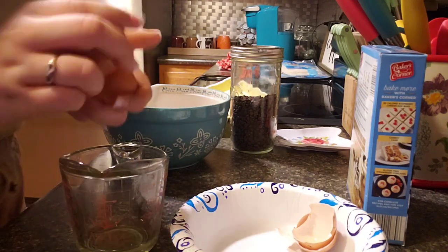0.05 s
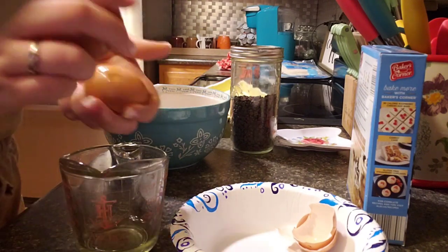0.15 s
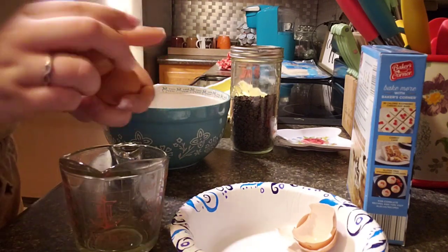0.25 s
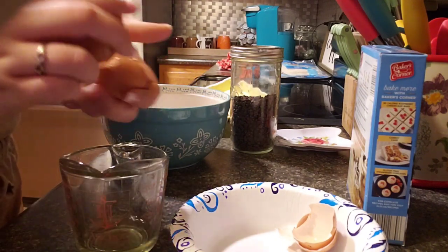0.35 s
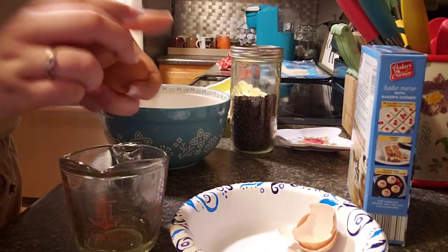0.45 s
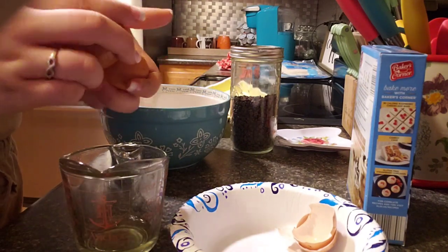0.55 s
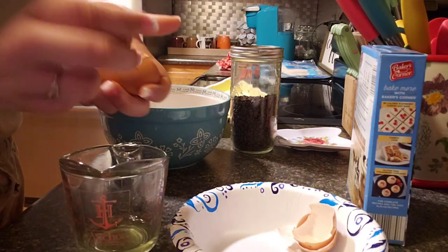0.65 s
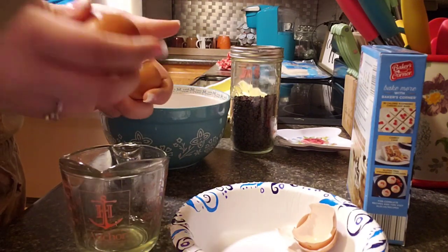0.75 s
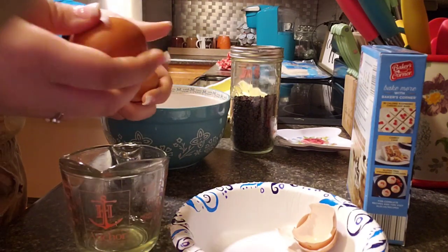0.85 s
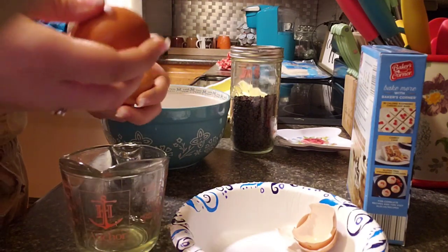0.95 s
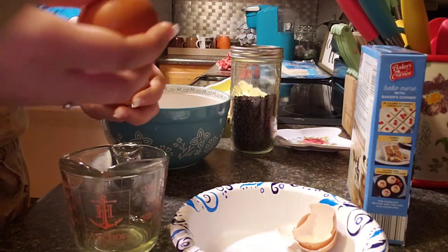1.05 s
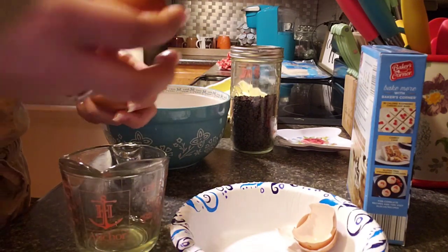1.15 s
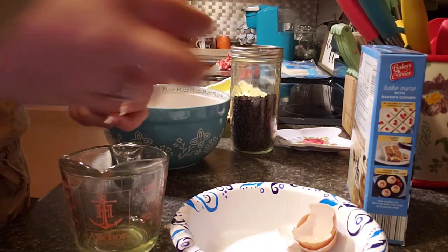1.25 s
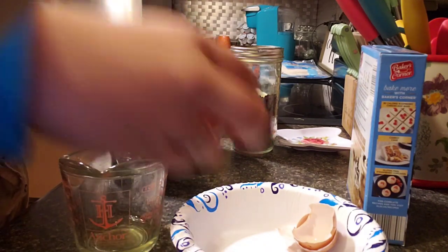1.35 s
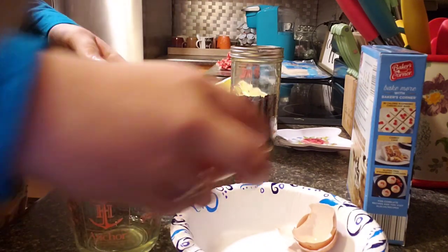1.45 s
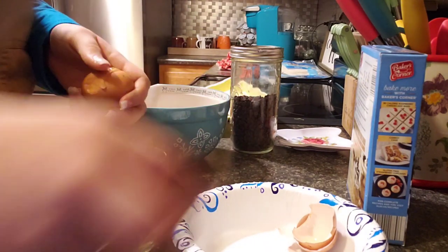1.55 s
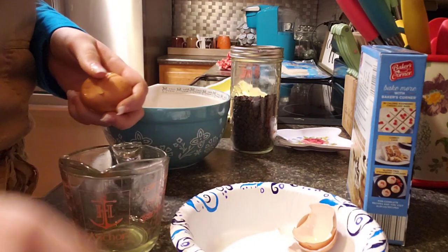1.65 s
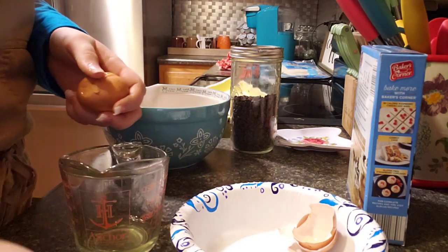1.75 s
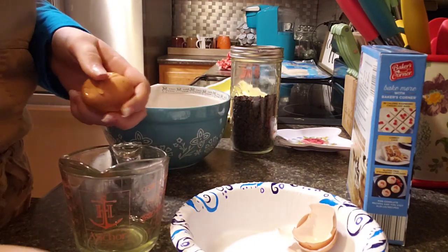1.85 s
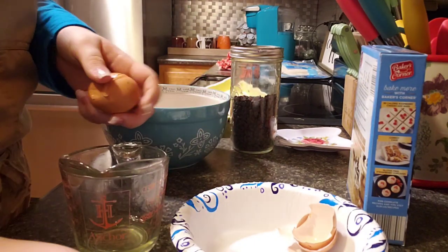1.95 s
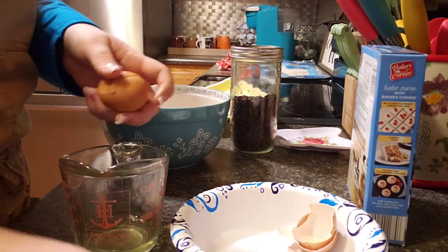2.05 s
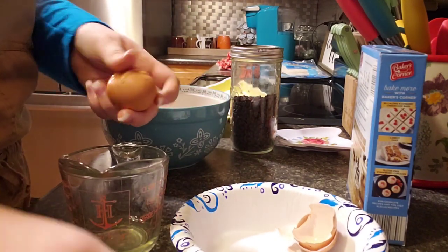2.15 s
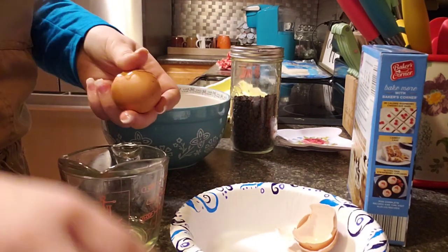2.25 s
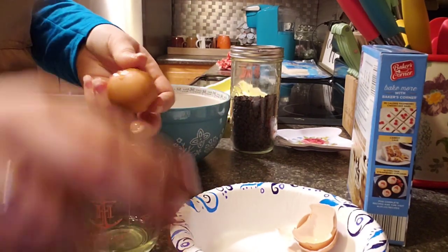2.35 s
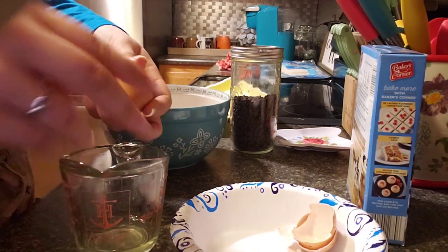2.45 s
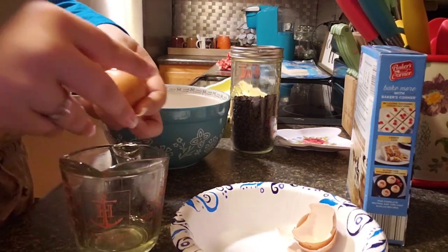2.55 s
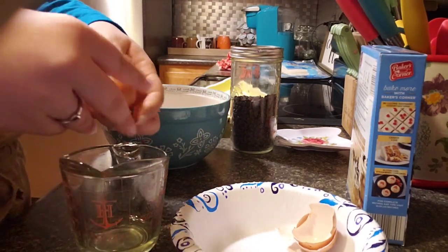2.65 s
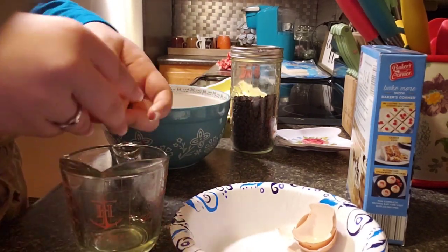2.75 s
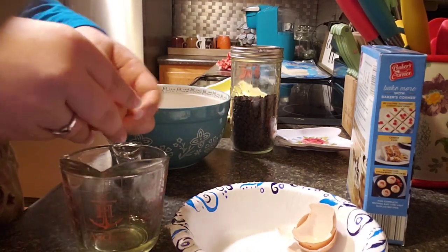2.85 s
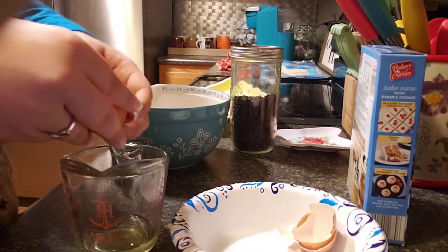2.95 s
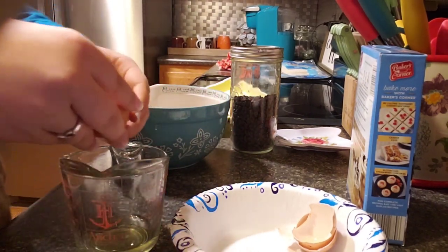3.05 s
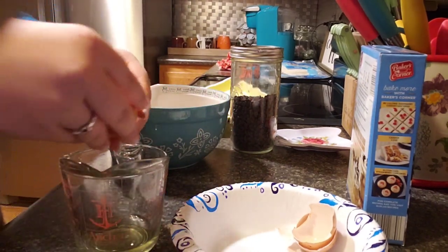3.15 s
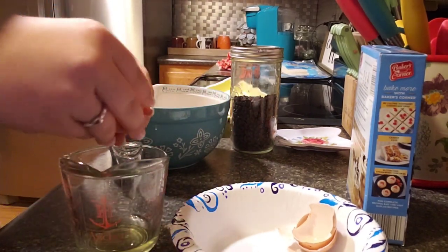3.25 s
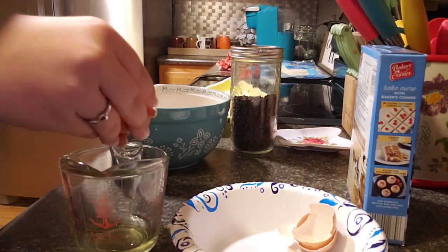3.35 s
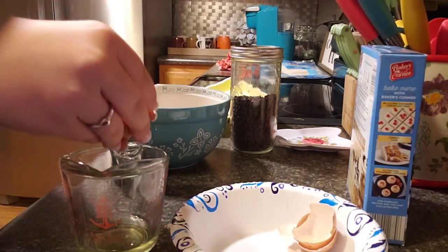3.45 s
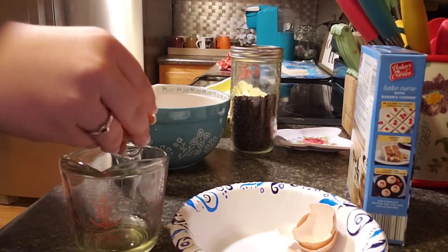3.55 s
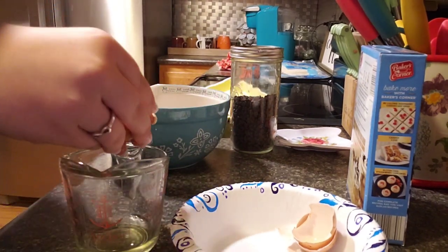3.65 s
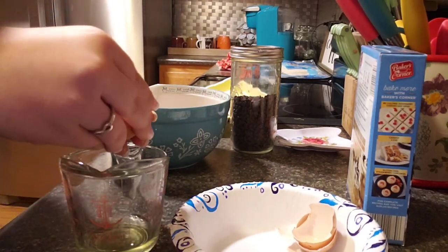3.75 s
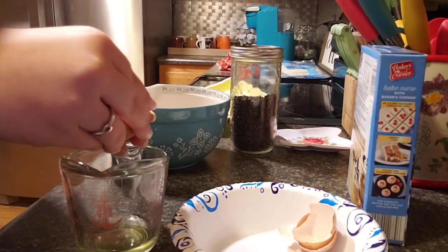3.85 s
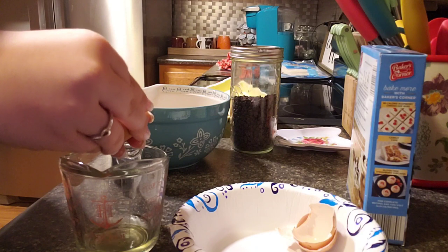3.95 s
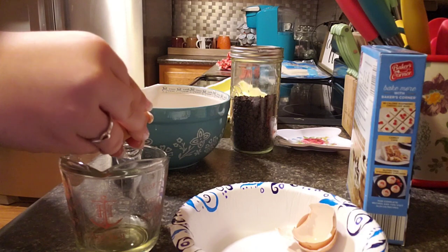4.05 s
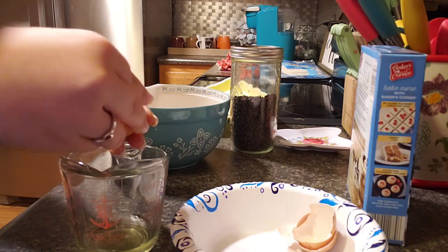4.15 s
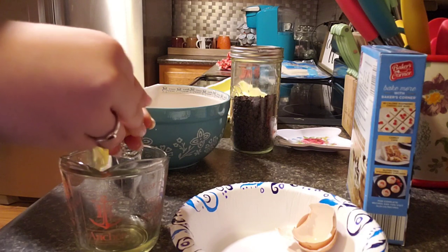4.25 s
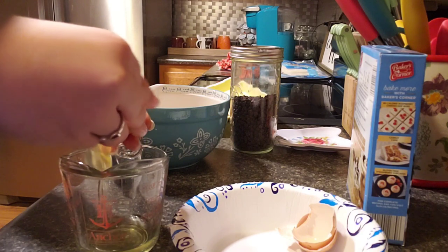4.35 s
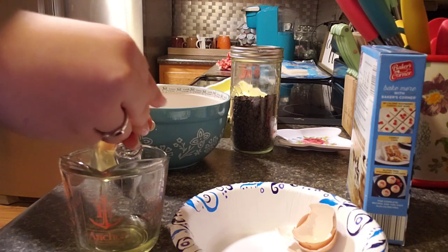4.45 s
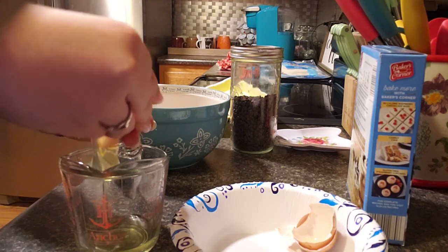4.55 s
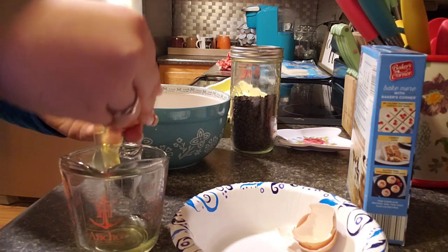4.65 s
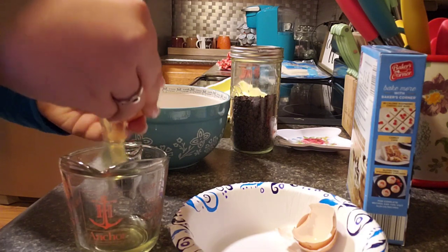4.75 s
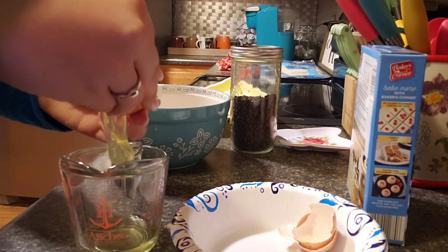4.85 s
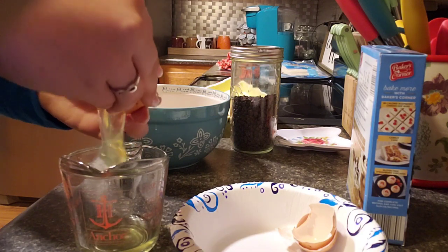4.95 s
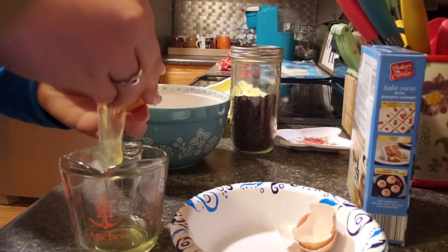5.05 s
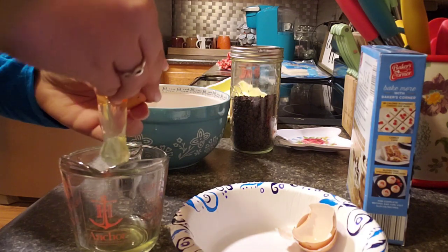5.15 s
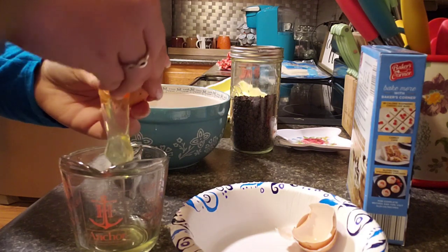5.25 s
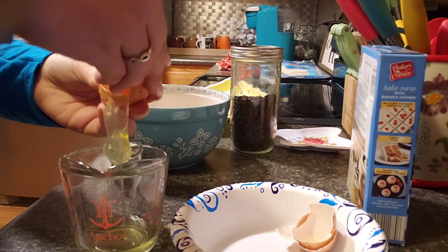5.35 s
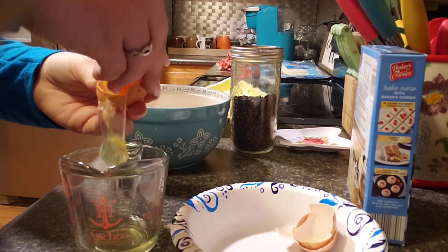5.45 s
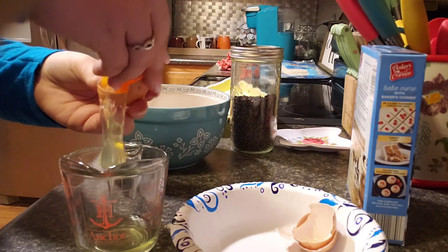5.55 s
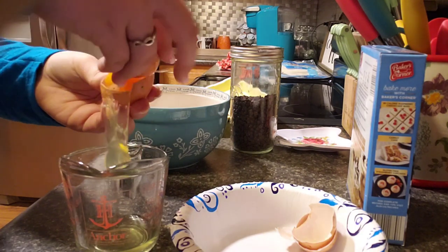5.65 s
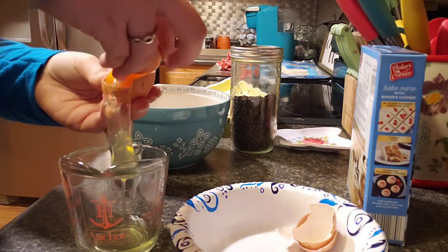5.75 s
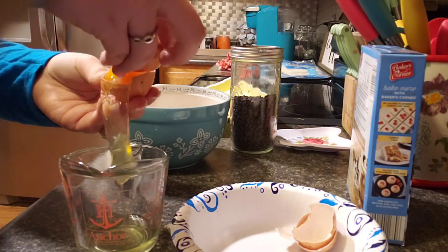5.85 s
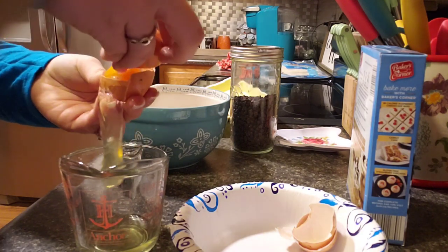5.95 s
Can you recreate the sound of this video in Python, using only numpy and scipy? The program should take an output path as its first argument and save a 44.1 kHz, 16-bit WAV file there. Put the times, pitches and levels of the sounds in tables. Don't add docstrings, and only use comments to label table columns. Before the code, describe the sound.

Three sharp eggshell knocks open the scene, the last weaker. Then a loud, dull dish thud with rapid bounces and a brief wobble, leaning left. Skin and sleeves rustle softly; small ticks lead to a sudden crisp crack, followed by quieter splintering and a short tear. Small live kitchen, close phone microphones with uneven stereo, quiet motor rumble and airy hiss underneath.

```python
import sys
import numpy as np
from scipy import signal
from scipy.fft import irfft
from scipy.io import wavfile
from scipy.ndimage import uniform_filter1d

SR = 44100
rng = np.random.default_rng(int(sys.argv[2]) if len(sys.argv) > 2 else 0)


def bounce(signal):
    frames = np.transpose(np.atleast_2d(signal))
    limited = np.clip(frames, -1, 1)
    pcm = np.round(limited * 32767).astype(np.int16)
    wavfile.write(sys.argv[1], SR, pcm)


def gain_from_db(level_db):
    decades = np.asarray(level_db, float) / 20
    return 10 ** decades


N = 264511
T = np.arange(N) / SR

# t/s, peak level/dB, rise/s, crunch t60/s, bowl ring level/dB
KNOCKS = [
    (0.087, -7.5, 0.00042, 0.044, -40),
    (0.297, -8, 0.0024, 0.056, -9),
    (0.5064, -11.5, 0.002, 0.051, -9.5),
]
# f/Hz, density level/dB
KNOCK_COLOURS = [
    [(500, -19), (950, -6.5), (1400, -13.5), (1800, -11), (2750, 3), (4000, -4), (5500, -6.5), (6600, -1.5),
     (8500, -14.5), (9600, -8), (11000, -14), (16000, -16.5)],
    [(500, -59), (1100, -32), (1800, -23), (2300, -20), (3000, -1.5), (3800, -1), (4500, -8.5), (5200, -15),
     (7200, 1), (8200, -10.5), (9800, -9.5), (16000, -11)],
    [(500, -37.5), (1250, -24.5), (1760, -10), (2150, -17), (2800, -4.5), (3700, -0.5), (5400, -7.5),
     (7200, -1), (8700, -10.5), (9600, -1), (12500, -12.5), (16000, -16)],
]
# f/Hz, level/dB, t60/s
BOWL_MODES = [(330, -8.5, 0.054), (594, 4.5, 0.032), (650.5, 2, 0.044), (675, -5, 0.028),
              (890, -14.5, 0.055), (1320, -17.5, 0.028)]
# t/s, peak level/dB, ring f/Hz
KNOCK_SPLINTERS = [(0.0875, -22.5, 6670), (0.0875, -13.5, 2720), (0.0881, -15.5, 3980), (0.0895, -21, 9570),
                   (0.0904, -17.5, 6400), (0.0906, -16.5, 2560), (0.0919, -22.5, 4280),
                   (0.093, -23.5, 9000), (0.0941, -24, 10470), (0.0942, -21.5, 4900), (0.0946, -32, 1650),
                   (0.0953, -16, 2870), (0.0984, -24, 9560), (0.101, -24.5, 2620), (0.1031, -23.5, 9600),
                   (0.1035, -28.5, 2760), (0.106, -30.5, 6650), (0.1104, -31.5, 1800), (0.1254, -28, 3100),
                   (0.2985, -23, 2490), (0.2996, -32, 7040), (0.2996, -12.5, 5200), (0.3003, -27, 8600),
                   (0.301, -21, 10500), (0.3016, -15.5, 2380), (0.3019, -27, 11710), (0.3027, -25.5, 6980),
                   (0.3034, -18.5, 3450), (0.3039, -19.5, 4680), (0.3041, -18, 10000), (0.3056, -19, 7430),
                   (0.3058, -18, 8960), (0.3065, -20.5, 2820), (0.3078, -19, 7200), (0.3114, -31, 5130),
                   (0.3123, -30, 6720), (0.313, -32.5, 9450), (0.3139, -23, 3627), (0.3156, -26.5, 6650),
                   (0.5086, -24.5, 8870), (0.5091, -17.5, 2680), (0.5104, -23.5, 5200), (0.5109, -23, 3900),
                   (0.5113, -24, 8000), (0.5118, -24.5, 5860), (0.5118, -32, 9390), (0.5118, -24, 2540),
                   (0.5129, -23.5, 4300), (0.5135, -30, 9500), (0.514, -41, 7630), (0.5144, -23, 5700),
                   (0.5151, -33, 10420), (0.5173, -32, 5770), (0.5191, -25, 2900), (0.5193, -34, 6300),
                   (0.52, -31, 7670), (0.528, -25, 3790)]
# t/s, peak level/dB, ring f/Hz
SHELL_FLEX = [(0.0868, -19, 1864), (0.0872, -30, 887), (0.0885, -28, 1460), (0.0882, -20.5, 4610),
              (0.2985, -30.5, 1676), (0.508, -25.5, 1790), (0.5085, -46, 1300), (0.088, -37.5, 345),
              (0.0885, -21, 5690), (0.3, -22.5, 5950), (4.146, -25.5, 4380), (4.1462, -25, 5410),
              (4.149, -33.5, 4680)]
# t/s, peak level/dB, ring f/Hz
PRISE_SPLINTERS = [(4.0275, -33, 4730), (4.0329, -31.5, 3860), (4.0356, -35, 4600), (4.0391, -38, 3600),
                   (4.0429, -41, 3550), (4.0518, -35, 4700), (4.0596, -40, 3500), (4.0629, -42, 3620),
                   (4.0639, -48, 2500), (4.0667, -40, 2220), (4.077, -41, 3800), (4.0812, -39, 2300),
                   (4.0832, -40, 2500), (4.0863, -47, 2500), (4.0904, -42, 2330), (4.093, -49, 2410),
                   (4.0953, -42, 3790), (4.1053, -41, 3640), (4.1352, -35, 4400), (4.1383, -41, 2460),
                   (4.1419, -42, 4650), (4.1458, -30, 6270), (4.1459, -29, 8100), (4.1465, -22, 9740),
                   (4.147, -16, 4450), (4.1483, -33, 7280), (4.1492, -32.5, 8270), (4.1519, -33, 8640),
                   (4.1523, -32, 6000), (4.1539, -27, 5060), (4.155, -33, 6460), (4.6831, -46, 2670),
                   (4.6885, -50, 2580), (4.692, -50, 2540), (4.7043, -46, 2560), (4.7078, -48, 2540),
                   (4.7125, -47.5, 4900), (4.7549, -40, 2540), (4.7569, -36, 3770), (4.758, -39, 4800),
                   (4.758, -37, 2560), (4.7644, -28.5, 2650), (4.7673, -36, 4820), (4.7674, -39, 2610),
                   (4.7752, -37, 2500), (4.7787, -32, 2520), (4.7852, -38, 5100), (4.7856, -26.5, 2880),
                   (4.7876, -27.5, 3820), (4.7905, -34, 3300), (4.7928, -45, 5000), (4.7937, -30, 2700),
                   (4.7981, -27, 2530), (4.8003, -36, 3860), (4.8014, -34, 2600), (4.8037, -42, 2600),
                   (4.8072, -43, 2500), (4.8092, -38, 2580), (4.8122, -38, 2700)]
# t/s, peak level/dB, ring f/Hz
FLAKES = [(2.085, -58, 3100), (2.8, -55, 600), (2.801, -55, 7230), (3.254, -54, 6980), (3.262, -54, 4000),
          (3.587, -59, 6900), (3.613, -58, 6740), (3.765, -55, 6830), (3.835, -53, 8360),
          (3.836, -52, 11480), (3.837, -48, 15300), (3.8365, -53, 13200), (3.885, -52, 5570),
          (3.897, -52, 6560), (3.899, -58, 8200), (3.938, -50, 5500), (4.027, -46, 5660), (4.03, -44, 6740),
          (4.065, -49, 7000), (4.067, -55, 11600), (4.097, -51, 9500), (4.098, -56, 5900),
          (4.32, -46, 3460), (4.321, -50, 5640), (4.322, -43, 9350), (4.432, -54, 11500),
          (4.433, -51, 8150), (4.434, -54, 6700), (4.433, -56, 14800), (4.755, -50, 10300),
          (4.765, -47, 7000), (4.786, -47, 9440), (4.793, -47, 9400), (4.79, -44, 7200),
          (5.645, -55.5, 7000), (5.68, -54, 4700), (5.683, -51, 6940), (5.728, -51, 6800)]
# t/s, peak level/dB, ring f/Hz, t60/s, snap level/dB
CRACKS = [(3.2126, -41, 6530, 0.027, 1), (3.8344, -43, 10100, 0.061, -2), (4.0257, -37, 4700, 0.14, -9),
          (4.0953, -39, 3680, 0.057, 3), (4.1345, -35, 4550, 0.037, 5), (4.1455, -15, 4370, 0.042, 10),
          (4.147, -41, 2200, 0.024, -9), (4.318, -37.5, 2530, 0.05, -6), (4.4318, -32, 3750, 0.03, -10),
          (5.6776, -43, 2660, 0.018, -9), (5.679, -43, 1890, 0.023, -9)]
# t/s, peak level/dB, ring f/Hz
TICKS = [(0.7956, -52, 6960), (2.1959, -50.5, 9390), (2.799, -51, 5200), (2.8, -54, 3560),
         (2.9706, -49.5, 9100), (3.3167, -48, 4270), (3.3288, -45, 7550), (3.406, -48, 6940),
         (3.4275, -38.5, 6700), (3.4694, -47, 9200), (3.55, -53.5, 7200), (3.6582, -55.5, 6780),
         (3.6935, -52, 7000), (3.7323, -52, 6550), (3.868, -46.5, 5970), (3.895, -42.5, 4200),
         (3.903, -46, 4600), (3.9343, -40.5, 6750), (3.94, -45, 4000), (3.952, -46, 6140),
         (3.971, -60.5, 12500), (4.2609, -41, 3690), (5.6379, -52, 7170), (5.706, -54, 2340),
         (5.7294, -47, 9800)]
# f/Hz, density level/dB
SNAP_COLOUR = [(710, -42), (1200, -44), (1520, -42), (2180, -15), (3080, -23), (4360, -6.5), (6030, -8.5),
               (9820, -11), (12600, -21), (16000, -27.5)]
# start t/s, hold/s, level/dB, release t60/s, fizz level/dB
TEARS = [
    (4.023, 0.075, -48.5, 0.34, -11),
    (4.683, 0.024, -56, 0.19, -6.5),
    (4.751, 0.034, -44.5, 0.11, -7),
    (4.783, 0.014, -39.5, 0.115, -11.5),
    (5.676, 0.027, -64, 0.18, 3.5),
]
# f/Hz, width/Hz, level/dB
SHELL_HOLLOW = [(1970, 500, -6), (2560, 450, -1.5), (3230, 530, -6.5), (3750, 230, -0.5), (5000, 440, -5)]
# f/Hz, density level/dB
FIZZ_COLOUR = [(4200, -29), (5000, 0), (5800, 4), (7000, 1.5), (8200, -3.5), (9500, -0.5), (11500, -7.5),
               (13000, -12), (15800, -10.5)]
# t/s, peak level/dB, low f/Hz, high f/Hz, t60/s
THUMPS = [
    (4.052, -47.5, 330, 1040, 0.21),
    (4.105, -50, 350, 1330, 0.12),
    (4.142, -50, 356, 1180, 0.11),
    (4.79, -56, 450, 975, 0.053),
    (5.04, -41.5, 149, 664, 0.075),
]
# t/s, peak level/dB, rim tick level/dB, tilt/dB per octave
LANDINGS = [
    (1.83494, -5, -28.5, 8),
    (1.83935, -7.5, -52, -5.5),
    (1.84373, -11, -48, 0.5),
    (1.84601, -9, -36, 12),
    (1.85627, -30, -30, -2),
]
# f/Hz, level/dB, t60/s
DISH_MODES = [(91, -1, 0.13), (159, 14, 0.021), (272, 2.9, 0.13), (428, 6.5, 0.088), (455, 8.5, 0.052),
              (516.4, 17.5, 0.081), (590, 13.5, 0.11), (684, 7.5, 0.07), (800, 0.5, 0.079), (957, -5, 0.15),
              (1013, -8.5, 0.053), (1415, -28, 0.1)]
# f/Hz, density level/dB
RIM_COLOUR = [(1200, -7), (1850, 8.5), (2500, -2.5), (4300, 2.5), (5600, -5), (6800, -0.5), (8200, -13),
              (11500, -18), (13500, -38)]
# t/s, peak level/dB
ROCK_TAPS = [(1.922, -37), (1.971, -36), (2.013, -34.5), (2.083, -40.5), (2.101, -34.5), (2.114, -37),
             (2.193, -58)]
# start t/s, length/s, level/dB
ROCKING = [
    (1.863, 0.11, -39),
    (1.949, 0.1, -44),
    (2.072, 0.079, -48.5),
    (2.17, 0.054, -65),
]
# f/Hz, width/Hz, level/dB
ROCK_BODY = [(268, 27, 0), (425, 32, -3), (476, 29, 2.5), (612, 37, -4), (690, 28, -6), (814, 21, -3.5),
             (913, 44, -15)]
# t/s, level/dB, low
# f/Hz, high f/Hz, t60/s
SLIPS = [(0.985, -62.5, 1710, 4170, 1.6), (0.99, -69, 4470, 7860, 0.31), (1.095, -54.5, 2340, 4630, 0.61),
         (1.101, -67.5, 5200, 9750, 0.37), (2.56, -65, 393, 1245, 0.79), (2.557, -56, 1950, 4630, 0.83),
         (2.554, -57.5, 5500, 10100, 0.54), (2.58, -64, 13100, 15230, 0.28), (2.933, -70, 7600, 9900, 5.8),
         (4.155, -53.5, 7540, 16000, 0.4), (5.535, -62.5, 6360, 9900, 0.47)]
# start t/s, level/dB, low f/Hz, high f/Hz, length/s
STROKES = [(1.17, -72.5, 4730, 4870, 0.43), (1.84, -62.5, 900, 2380, 0.2),
           (1.95, -77.5, 11400, 14200, 0.39), (2.97, -64.5, 7300, 9700, 0.2), (3.0, -63, 690, 3600, 0.38),
           (4.15, -64.5, 1730, 2250, 0.31), (5.08, -65.5, 1300, 4020, 0.15), (5.35, -80.5, 800, 1266, 0.85),
           (5.53, -72.5, 13900, 15970, 0.09), (5.615, -63, 1389, 10100, 0.21),
           (5.785, -63, 5360, 9420, 0.15)]
# t/s, level over rest/dB, brightness/dB per
RUBBING = [(0.0, 26.5, -6.5), (0.15, 10.5, 2.5), (0.78, -7, 1.5), (1.2, 19.5, -6), (1.419, 14.5, -2.5),
           (1.75, -7.5, 0), (1.95, 17.5, 1), (2.2, 14, 2.5), (2.55, 10.5, 2), (2.901, 9.5, -2),
           (3.141, 13.5, 2), (3.6, 1, 0.5), (3.96, 17.5, 1.5), (4.22, 25, -5.5), (4.5, 7.5, -0.5),
           (4.849, 7, -2), (5.298, 1.5, 0.5), (5.75, -6, 2.5)]
# f/Hz, density level/dB
RUB_COLOUR = [(240, -69), (400, 9.5), (481, -2.5), (553, -23), (615, 18), (752, -12.5), (1350, -21.5),
              (2530, -14.5), (3500, -15.5), (6100, -25), (6890, -19.5), (8030, -29), (9510, -28.5),
              (10400, -55), (15800, -61.5)]
RUB_EDGES_HZ = [900, 2200, 4950, 10500, 15900]
RUB_REST_DB = [-78.5, -78.5, -77.5, -77.5]
RUB_FOLLOWS = [0.28, 0.9, 0.58, 0.32]
# f/Hz, density level/dB
RUMBLE_COLOUR = [(21, -32.5), (40, -15.5), (54, -4.5), (75, -3), (141, -14.5), (201, -15), (269, -23.5),
                 (393, -24), (520, -35.5), (680, -59.5), (1140, -120)]
# f/Hz, density level/dB
HISS_COLOUR = [(310, -27.5), (520, 9), (786, 9), (933, 11), (1410, -27), (1600, 9), (3090, -28), (3670, 0),
               (4480, -21.5), (6300, -26), (7270, -8), (8270, -27), (9670, -6.5), (10500, -21),
               (15750, -15.5), (15950, -60)]
# f/Hz, level/dB
MOTOR = [(56.75, -49), (103.2, -65.5), (120, -73.5)]
# f/Hz, width/Hz, level/dB
ROOM_MODES = [(48.94, 20, -49), (58.2, 4, -62)]
# f/Hz, width/Hz, level/dB
WHINES = [(185.8, 4, -65.5), (322, 6.3, -74), (389.7, 1.6, -72.5)]
# f/Hz, width/Hz, level/dB
WHIRR = [(610, 60, -77), (3650, 330, -77.5), (15200, 1400, -85)]
# f/Hz, t60/s
KITCHEN_T60 = [(300, .33), (1000, 0.55), (3000, 0.47), (8000, 0.39), (15000, 0.23)]
# f/Hz, left over right level/dB
PORTS = [(60, 3.5), (200, 8.5), (380, -3.5), (700, 6.5), (1380, 8.5), (2400, 15), (3450, 23), (4500, 20.5),
         (5500, 6.5), (8600, 4.5), (9650, 11), (10700, -2), (11700, -10.5), (15000, -6.5)]
# f/Hz, left-right coherence
SAME = [(60, 0.96), (200, 0.64), (600, 0.69), (1300, 0.11), (5500, 0.093), (7000, 0.77), (9000, 1),
        (11000, 0.94), (15000, 0.15)]
# f/Hz, extra left level/dB
DISH_LEAN = [(60, -3), (200, 21), (400, 16.5), (700, 3), (1300, 1), (8000, 3)]

CRUNCH_PER_S, ROOM_COLOUR_SHARE, ROOM_SEND_DB = 9900, 0.5, 2
SPLINTER_RISE_S, SPLINTER_DB = 0.0005, 3
SPLINTER_T60_S, PRISE_T60_S, FLEX_T60_S, FLAKE_T60_S = 0.014, 0.014, 0.021, 0.018
TICK_T60_S, TICK_SNAP_DB = 0.034, -6
TEAR_RISE_S, SLIP_RISE_S, LANDING_RISE_S = 0.0031, 0.0078, 0.0026
STROKE_LEAN = 0.57
RUMBLE_DB, HISS_DB, LOAD_DB_PER_S = -53.5, -75, 1.08
EDGE_HZ = 16150


def evened(x):
    return x / np.sqrt(np.mean(x ** 2) + 1e-20)


def read(points, hz):
    f, value = np.transpose(points)
    return np.interp(np.log(hz + 1), np.log(f + 1), value)


def add(mix, s, sound):
    part = mix[..., round(s * SR):][..., :sound.shape[-1]]
    part += sound[..., :part.shape[-1]]


def band(x, lo_hz, hi_hz, order=5):
    sos = signal.butter(order, [lo_hz, hi_hz], "bandpass", fs=SR, output="sos")
    return signal.sosfilt(sos, x)


def coloured(x, colour):
    hz = abs(np.fft.fftfreq(2048, 1 / SR))
    log_gain = np.log(gain_from_db(np.maximum(read(colour, hz), -70)))
    taps = np.fft.ifft(np.exp(np.conj(signal.hilbert(log_gain)))).real[:1024]
    return signal.oaconvolve(x, taps / np.linalg.norm(taps))[:len(x)]


def resonate(x, hz, width_hz):
    return signal.lfilter(*signal.iirpeak(hz, hz / width_hz, SR), x)


def body(x, peaks):
    return sum((-1) ** k * gain_from_db(db) * resonate(x, hz, width)
               for k, (hz, width, db) in enumerate(peaks))


def ring(modes, seconds):
    t = T[:round(seconds * SR)]
    y = sum(gain_from_db(db - 60 * t / t60) * np.sin(2 * np.pi * hz * t) for hz, db, t60 in modes)
    return y / abs(y).max()


def crackle(length, per_s, spread_db):
    place, sign, size = rng.random((3, length))
    clicks = (place < per_s / SR) * np.sign(sign - 0.5)
    return evened(clicks * gain_from_db(-spread_db * np.log(size + 0.01)))


def noise(colour, patchy_db):
    frames, hz = N // 256 + 5, np.fft.rfftfreq(1024, 1 / SR)
    a, b, c, d, patches = rng.standard_normal((frames, 513, 5)).T
    patches = uniform_filter1d(patches, size=14, axis=0)
    patches = evened(uniform_filter1d(patches, size=12, axis=1))
    gain = gain_from_db(read(colour, hz)[:, None] + patchy_db * patches)
    spectra = np.array([a + 1j * b, c + 1j * d]) * gain
    return signal.istft(spectra, nperseg=1024, noverlap=768)[1][:, :N]


def knock(row, colour):
    s, db, rise, t60, bowl_db = row
    t = T[:round(0.12 * SR)]
    peak_at = round(rise * SR)
    shape = (1 - np.exp(-(t / rise) ** 2)) * gain_from_db(-60 * t / t60)
    blow = signal.unit_impulse(len(t), peak_at)
    crunch = gain_from_db(1) * blow + crackle(len(t), CRUNCH_PER_S, spread_db=5.5) * shape
    direct = gain_from_db(-1.5) * coloured(crunch, colour)
    room_colour = np.array(colour) * [1, ROOM_COLOUR_SHARE]
    sent = gain_from_db(ROOM_SEND_DB) * coloured(blow, room_colour) * np.linalg.norm(shape)
    bowl = np.roll(ring(BOWL_MODES, 0.12) * np.minimum(t / 0.0039, 1), peak_at)
    bowl_gain = gain_from_db(db + bowl_db + np.array([[0], [-4.0]]))
    return s, gain_from_db(db - 6.0) * np.array([direct, sent]) + bowl_gain * bowl


def splinter(s, db, hz, send_db, t60):
    t = T[:round(0.04 * SR)]
    onset = 1 - np.exp(-(t / SPLINTER_RISE_S) ** 2)
    flake = np.sin(2 * np.pi * hz * t) * onset * gain_from_db(db + SPLINTER_DB - 60 * t / t60)
    return s - SPLINTER_RISE_S, flake * gain_from_db(np.array([[0], [send_db]]))


def crack(s, db, hz, t60, snap_db):
    t = T[:round(0.06 * SR)]
    burst = crackle(len(t), 12000, spread_db=2.5) * gain_from_db(-60 * t / t60)
    piece = resonate(resonate(burst, hz, 0.15 * hz), hz, 0.15 * hz)
    sound = evened(piece) + gain_from_db(snap_db + 5.5) * evened(coloured(burst, SNAP_COLOUR))
    return s, gain_from_db(db) * sound / abs(sound).max()


def tear(s, hold, db, t60, bright_db):
    t = T[:round(0.3 * SR)]
    clicks = crackle(len(t), 6000, spread_db=3.0)
    hollow = evened(band(body(clicks, SHELL_HOLLOW), 2200, 4900, order=2))
    fizz = gain_from_db(bright_db) * evened(coloured(clicks, FIZZ_COLOUR))
    release = gain_from_db(db - 60 * np.maximum(t - hold, 0) / t60)
    return s, release * (hollow + fizz) * np.minimum(t / TEAR_RISE_S, 1)


def thump(s, db, lo_hz, hi_hz, t60):
    t = T[:round(0.1 * SR)]
    dull = np.cumsum(rng.standard_normal(len(t)))
    push = band(dull, lo_hz, hi_hz, order=2) * gain_from_db(-60 * t / t60) * np.minimum(t / 0.013, 1)
    return s, gain_from_db(db) * push / abs(push).max()


def landing(s, db, tick_db, tilt_db):
    t = T[:round(0.25 * SR)]
    modes = [(hz, level + tilt_db * np.log2(hz / 500), t60) for hz, level, t60 in DISH_MODES]
    note = -ring(modes, 0.25) * np.minimum(t / LANDING_RISE_S, 1)
    decay = gain_from_db(-60 * t / 0.015) + gain_from_db(-8 - 60 * t / 0.13)
    tick = coloured(rng.standard_normal(len(t)), RIM_COLOUR) * np.minimum(t / 0.0013, 1) * decay
    return s, gain_from_db(db) * (note + gain_from_db(tick_db) * tick)


def rocking():
    taps = np.zeros(N)
    tap = body(band(signal.unit_impulse(round(0.25 * SR)), 144, 580), ROCK_BODY)
    for s, db in ROCK_TAPS:
        add(taps, s, gain_from_db(db) * tap / abs(tap).max())
    swings = sum(gain_from_db(db) * np.sin(np.pi * np.clip((T - s) / length, 0, 1))
                 for s, length, db in ROCKING)
    bumps = band(crackle(N, 1800, spread_db=2.0), 127, 1320)
    return taps + evened(body(bumps, ROCK_BODY)) * swings


def dish():
    out = rocking()
    for row in LANDINGS:
        add(out, *landing(*row))
    return out


def slip(s, db, lo_hz, hi_hz, t60, rise):
    t = T[:round(0.55 * SR)]
    grain = evened(band(crackle(len(t), 15000, spread_db=-3.0), lo_hz, hi_hz, order=3))
    ends = np.minimum(t / rise, 1) * np.minimum((t[-1] - t) / 0.068, 1)
    return s, gain_from_db(db + 1.5 - 60 * t / t60) * grain * ends


def stroke(s, db, lo_hz, hi_hz, length):
    t = T[:round(0.6 * SR)]
    grain = evened(band(crackle(len(t), 15000, spread_db=5.5), lo_hz, hi_hz, order=3))
    return s, gain_from_db(db) * grain * np.sin(np.pi * np.minimum(t / length, 1) ** STROKE_LEAN)


def rubbing():
    s, pressure_db, bright_db = np.transpose(RUBBING)
    hiss = noise(RUB_COLOUR, patchy_db=1.3)
    out = np.zeros((2, N))
    bands = zip(RUB_EDGES_HZ, RUB_EDGES_HZ[1:], RUB_REST_DB, RUB_FOLLOWS)
    for k, (lo, hi, rest_db, share) in enumerate(bands):
        level_db = rest_db + share * pressure_db + (k - 1) * bright_db
        out += gain_from_db(np.interp(T, s, level_db)) * evened(band(hiss, lo, hi, order=10))
    return out


def appliance():
    rumble, hiss = noise(RUMBLE_COLOUR, patchy_db=-1.0), noise(HISS_COLOUR, patchy_db=0.0)
    air = gain_from_db(RUMBLE_DB) * rumble / np.std(band(rumble, 70, 500)) + gain_from_db(HISS_DB) * evened(hiss)
    white = rng.standard_normal((2, N))

    def fuzzy(tones):
        return sum(gain_from_db(db) * evened(resonate(resonate(white, hz, width), hz, 2 * width))
                   for hz, width, db in tones)

    motor = sum(gain_from_db(db) * np.sqrt(2) * np.sin(2 * np.pi * hz * T) for hz, db in MOTOR)
    load = gain_from_db(LOAD_DB_PER_S * (T - T.mean()))
    return air + load * (motor + fuzzy(ROOM_MODES)) + fuzzy(WHINES + WHIRR)


def kitchen(x, early_db, late_db):
    taps = np.zeros((2, SR // 2))
    at = np.arange(300, SR // 2 - 20, 20)
    at = at + rng.integers(0, 20, (2, len(at)))
    np.put_along_axis(taps, at, rng.choice([-1., 1.], at.shape), 1)
    hz, t, z = signal.stft(taps, SR, nperseg=256)
    decay = gain_from_db(-60 * t / read(KITCHEN_T60, hz)[:, None])
    tail = signal.istft(z * decay, SR, nperseg=256)[1]
    tail *= gain_from_db(late_db) / np.linalg.norm(tail[0])

    near = rng.integers(8, 300, (2, 8))
    echoes = gain_from_db(np.array(early_db)) * rng.choice([-1., 1.], near.shape) * np.exp(-near / 300)
    early = np.zeros_like(tail)
    np.put_along_axis(early, near, echoes, 1)
    early = band(early, 1400, 18000, order=1)
    early[0, 4], early[1, 0] = 1, 1

    direct, sent = x * np.ones((2, 1))
    close = signal.fftconvolve(direct[None], early, axes=1)
    late = signal.fftconvolve(sent[None], tail, axes=1)
    return (close + late)[:, :N]


def ports(x, lean_db):
    hz = np.fft.rfftfreq(1024, 1 / SR)
    same = np.clip(read(SAME, hz), 0, 1)
    right = gain_from_db(-read(PORTS, hz) - lean_db(hz))
    left = 2 / np.sqrt(1 + right ** 2 + 2 * same * right)
    gains = np.array([left, left * right * same, left * right * np.sqrt(1 - same ** 2)])
    taps = np.fft.fftshift(irfft(gains), 1) * np.hanning(1024)
    padded = np.pad(x[[0, 0, 1]], ((0, 0), (511, 512)), "reflect")
    one, shared, own = signal.oaconvolve(padded, taps, "valid", axes=1)
    return np.array([one, shared + own])


def scene():
    shell = np.zeros((2, N))
    for row, colour in zip(KNOCKS, KNOCK_COLOURS):
        add(shell, *knock(row, colour))
    layers = [
        (KNOCK_SPLINTERS, splinter, (-13.0, SPLINTER_T60_S)),
        (SHELL_FLEX, splinter, (-10.0, FLEX_T60_S)),
        (PRISE_SPLINTERS, splinter, (-10.0, PRISE_T60_S)),
        (FLAKES, splinter, (-5.0, FLAKE_T60_S)),
        (CRACKS, crack, ()),
        (TICKS, crack, (TICK_T60_S, TICK_SNAP_DB)),
        (TEARS, tear, ()),
        (THUMPS, thump, ()),
        (SLIPS, slip, (SLIP_RISE_S,)),
        (STROKES, stroke, ())]
    for rows, source, shared in layers:
        for row in rows:
            add(shell, *source(*row, *shared))
    ahead = kitchen(shell, early_db=[[-12.0], [-7.0]], late_db=-10.0) + rubbing() + appliance()
    aside = kitchen(dish(), early_db=-18, late_db=-15)
    return ports(ahead, np.zeros_like) + ports(aside, lambda hz: read(DISH_LEAN, hz))


def roll_off(x):
    return signal.sosfilt(signal.butter(12, 16610, fs=SR, output="sos"), x)


def record(dry):
    highpass = signal.butter(4, 42, "highpass", fs=SR, output="sos")
    held = np.clip(signal.sosfilt(highpass, dry), -0.95, 0.95)
    edge = signal.firwin(601, EDGE_HZ, window=("kaiser", 7), fs=SR)[None]
    padded = np.pad(held, ((0, 0), (300, 300)), "reflect")
    finished = signal.oaconvolve(padded, edge, "valid", axes=1)
    return roll_off(finished)


dry = scene()
out = record(dry)
bounce(out)
```